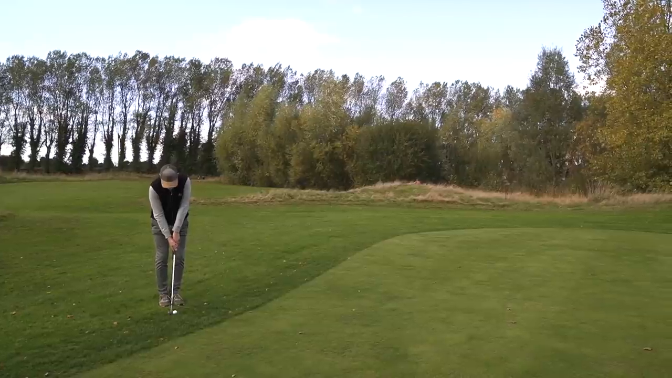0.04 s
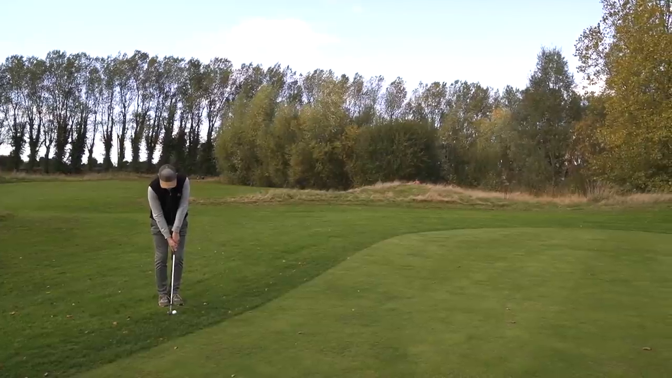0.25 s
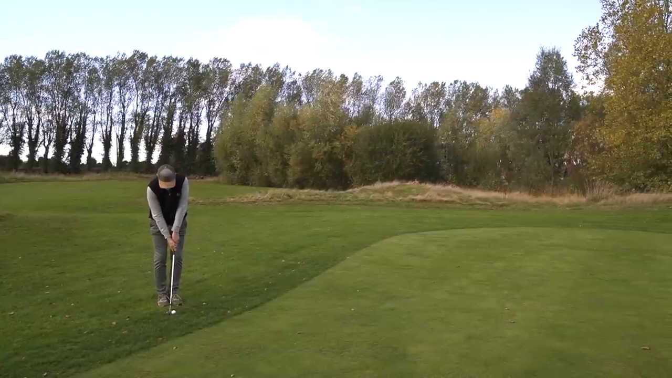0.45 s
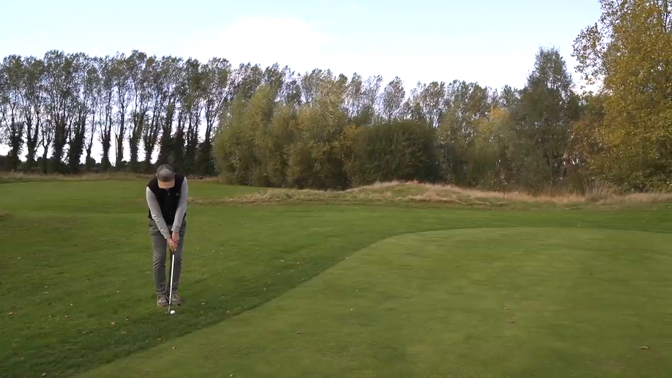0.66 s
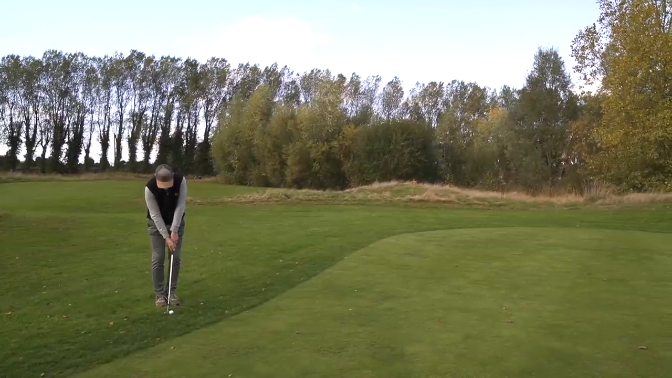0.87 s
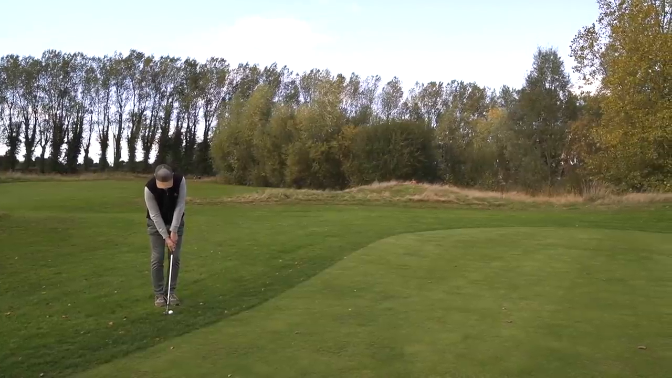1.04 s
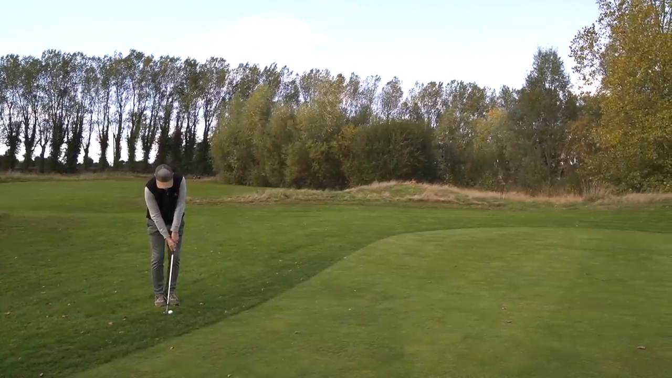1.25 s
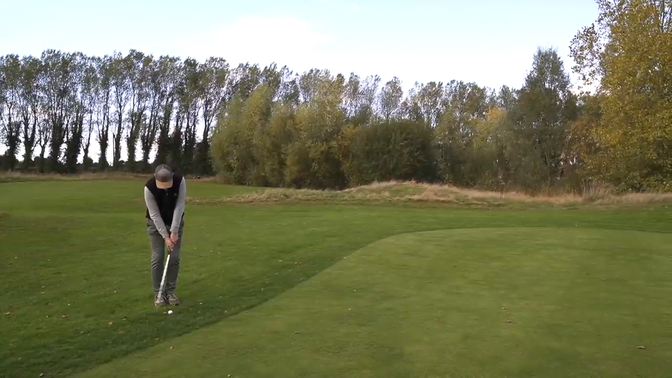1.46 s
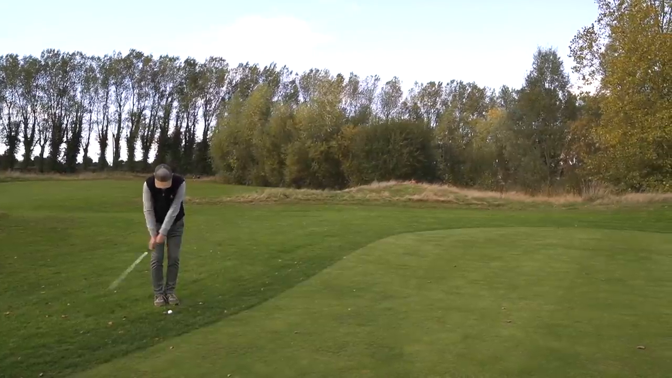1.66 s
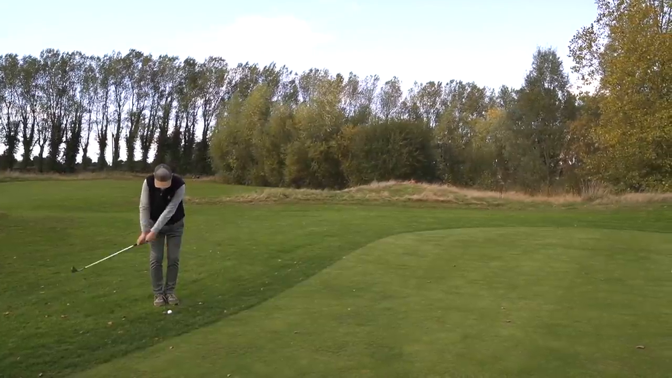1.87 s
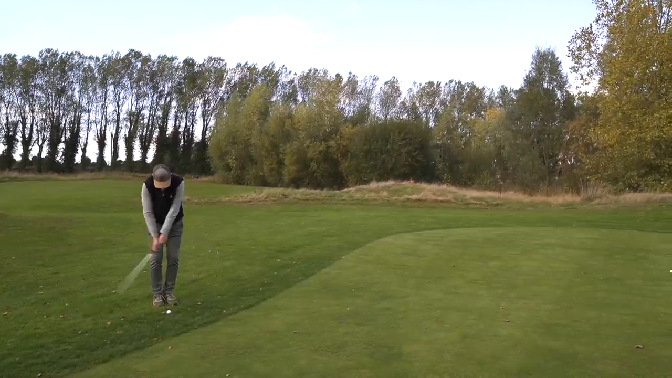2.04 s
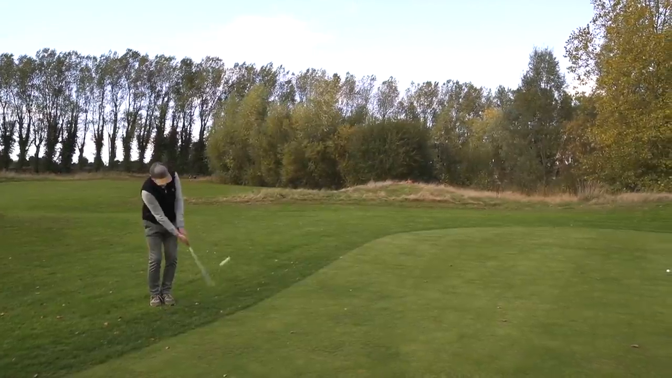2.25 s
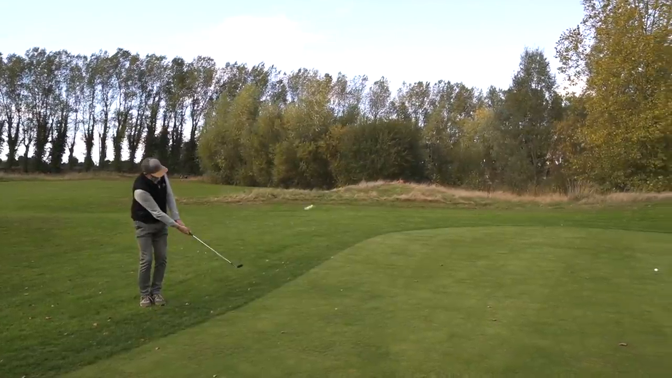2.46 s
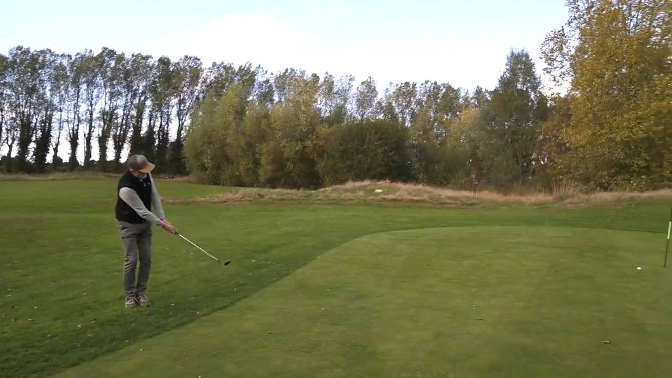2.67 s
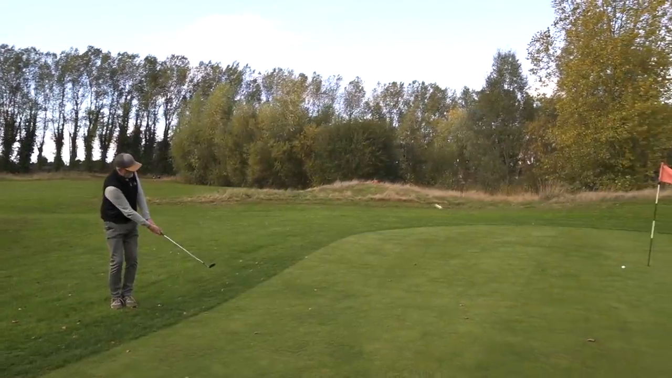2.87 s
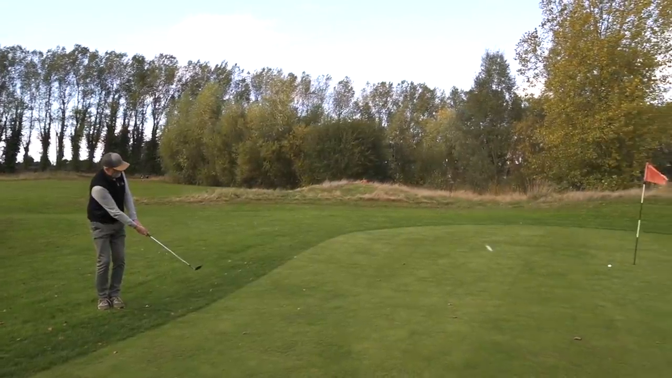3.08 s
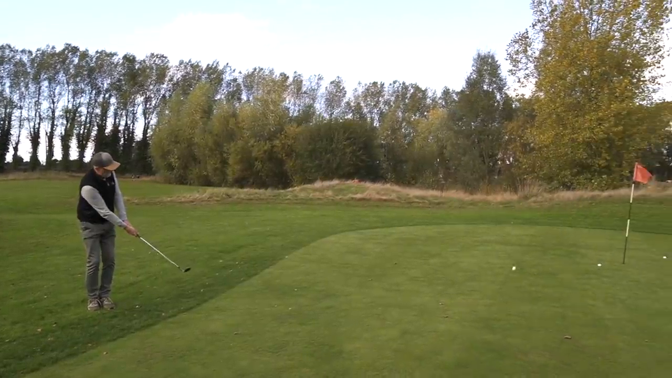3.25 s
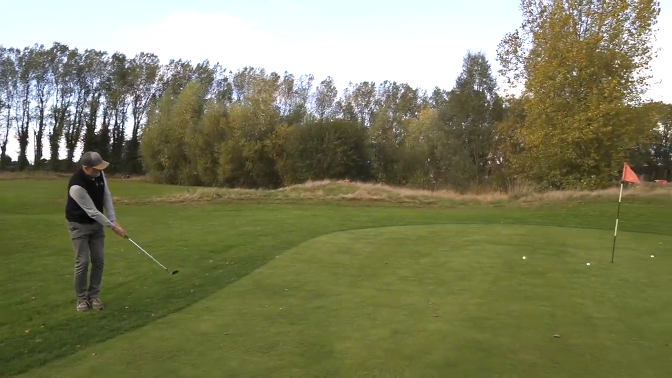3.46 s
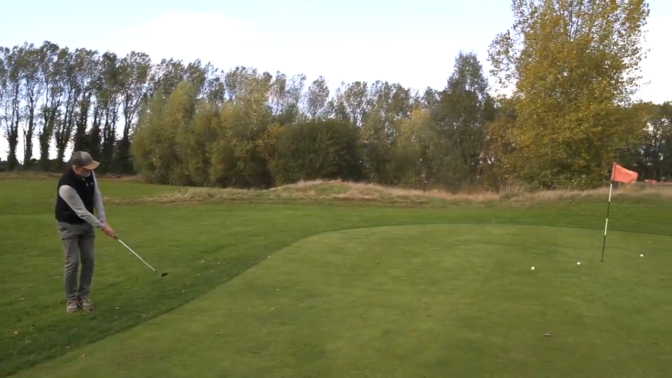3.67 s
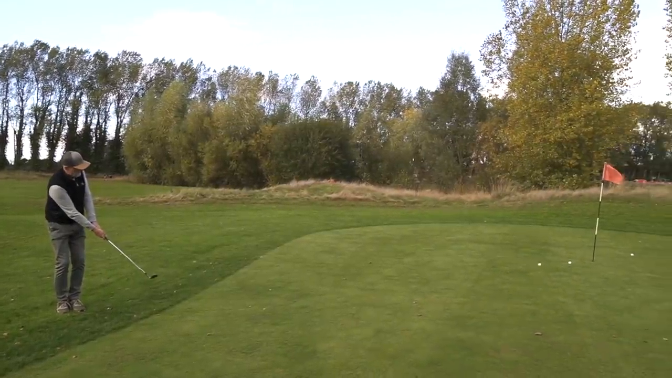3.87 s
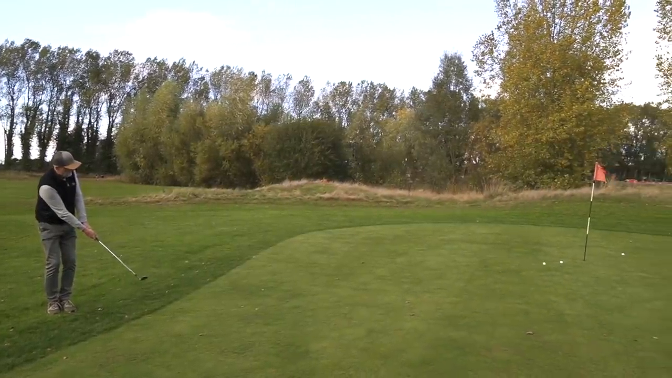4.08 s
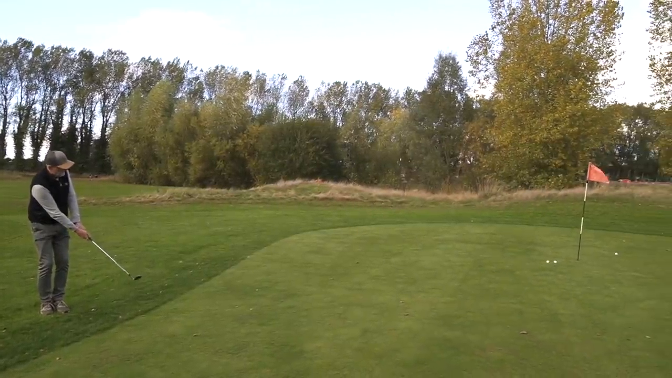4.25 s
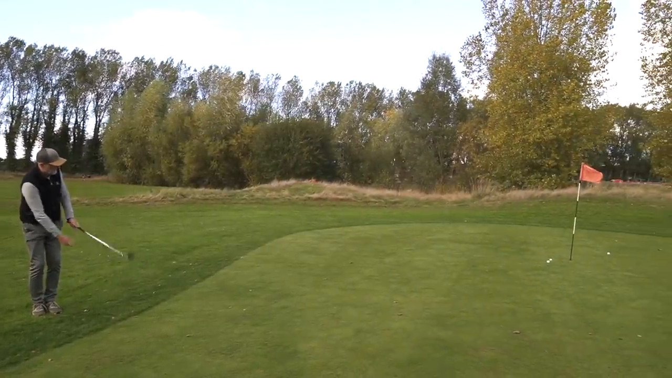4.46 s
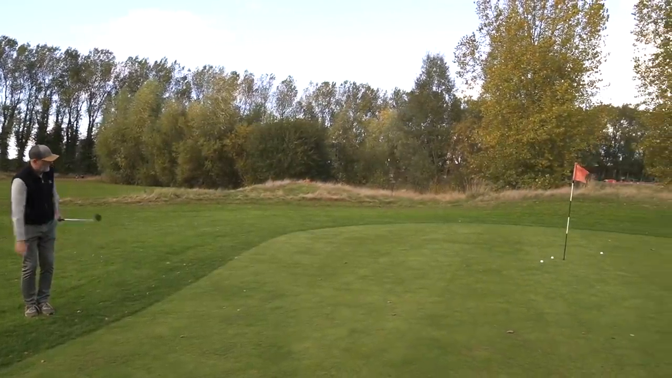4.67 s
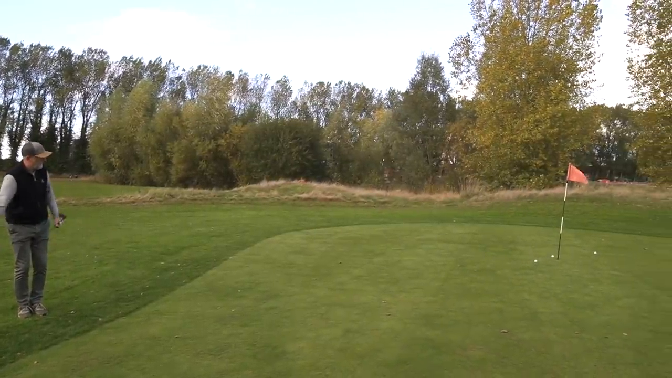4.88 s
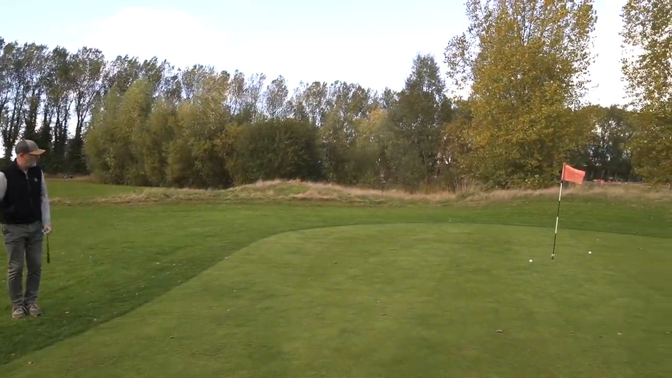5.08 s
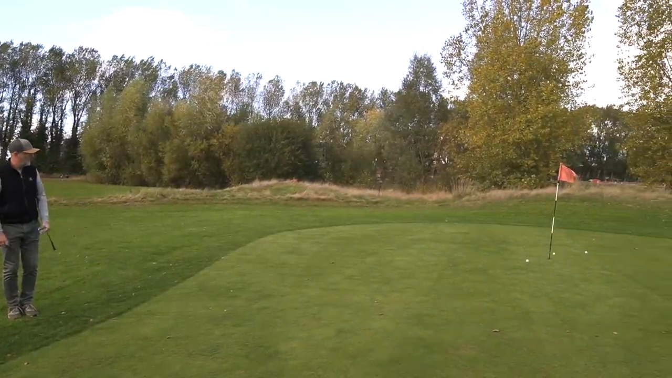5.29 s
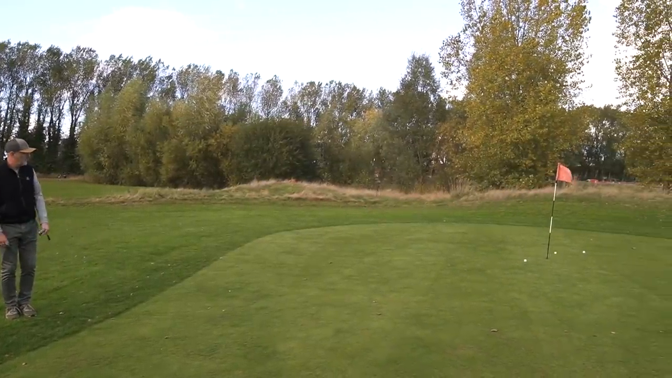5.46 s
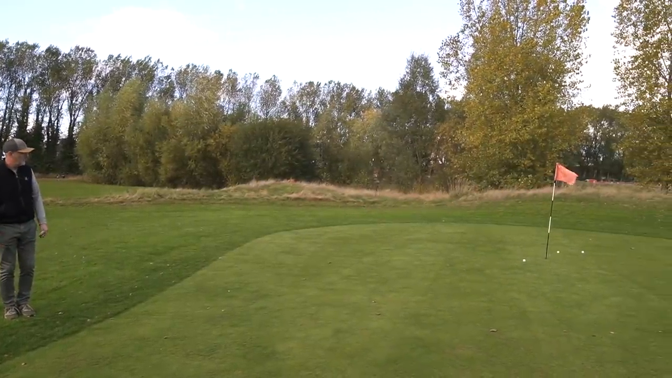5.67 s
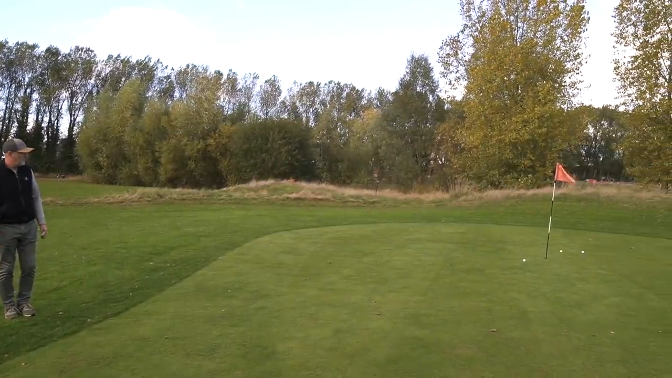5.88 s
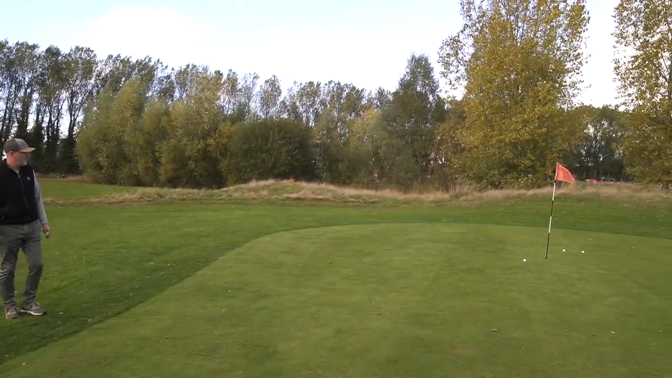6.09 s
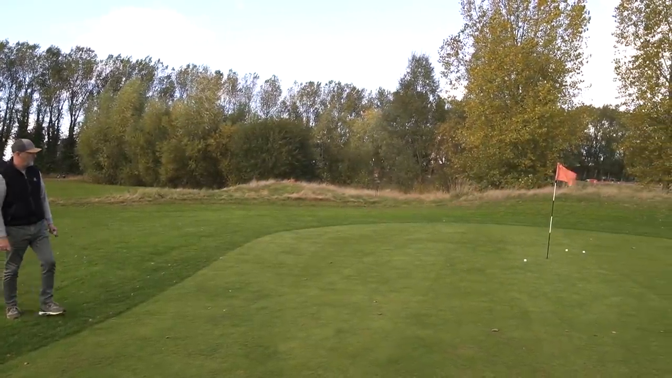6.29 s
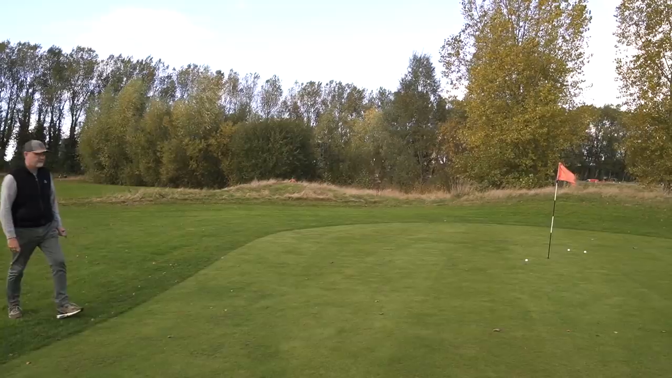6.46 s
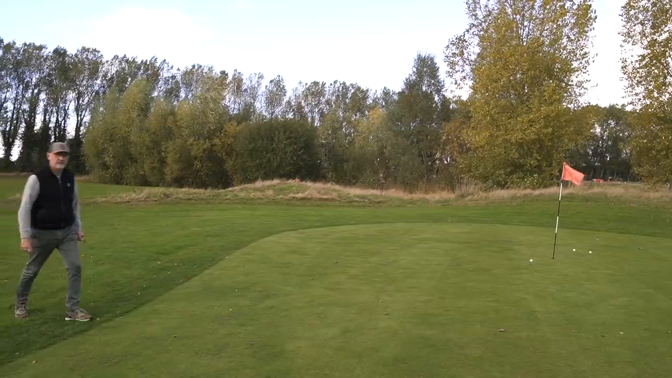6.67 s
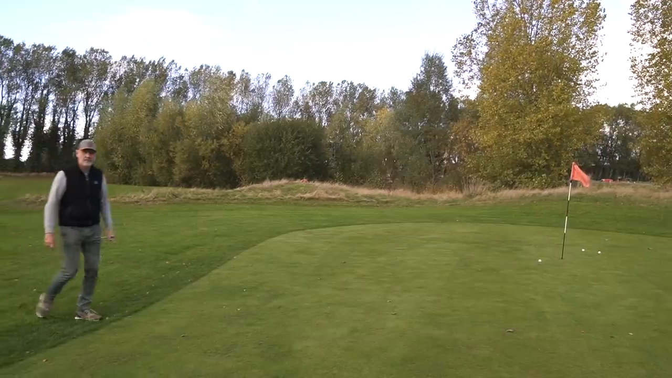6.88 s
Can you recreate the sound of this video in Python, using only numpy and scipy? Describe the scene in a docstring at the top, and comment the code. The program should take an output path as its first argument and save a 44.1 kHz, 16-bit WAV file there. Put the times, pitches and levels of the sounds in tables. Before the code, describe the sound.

Outdoors on a golf course, wind murmurs in distant trees and lightly buffets a microphone clipped to a jacket. Cloth rubs and bumps during the backswing, then the club hits the ball with a sharp, dry clack and a brief brush of grass. A second later the ball thuds on the green and bounces once. The jacket rustles, ticks and thumps again as the golfer turns and starts walking.

```python
"""On a breezy golf course, a golfer plays a short chip, heard from a small microphone on his jacket.
Wind murmurs in the trees and buffets the microphone. Cloth rubs, ticks and bumps against it in the
backswing, the stroke and the walk that follows. The club face clacks on the ball, the head rings and
the sole brushes the turf; a second later the ball thuds onto the green and bounces once."""
import sys
import numpy as np
from scipy import signal
from scipy.fft import rfft, irfft
from scipy.io import wavfile
from scipy.ndimage import uniform_filter1d

SR = 44100
rng = np.random.default_rng(int(sys.argv[2]) if len(sys.argv) > 2 else 0)


def output_pcm(signal):
    """Save a mono or channel-first signal as 16-bit PCM at the path in sys.argv[1].

    Samples are clipped to [-1, 1] before scaling.
    """
    pcm = np.clip(np.atleast_2d(signal).T, -1, 1) * 32767
    wavfile.write(sys.argv[1], SR, np.round(pcm).astype(np.int16))


N = 305613
T = np.arange(N) / SR
HIT_T = T[:8192]  # time axis of a one-shot


def undb(db):
    """Decibels to gain."""
    return 10 ** (np.asarray(db) / 20)


def unit(x):
    """Scale to rms 1."""
    return x / np.sqrt(np.mean(x ** 2))


def peak(x, db):
    """Scale to a peak level."""
    return x * undb(db) / np.max(np.abs(x))


def add(out, start_s, x):
    """Drop a one-shot into the mix."""
    i = int(start_s * SR)
    out[i:i + len(x)] += x[:N - i]


def butter(x, order, hz, kind):
    """Butterworth filter."""
    return signal.sosfilt(signal.butter(order, hz, kind, fs=SR, output="sos"), x)


def eq(x, curve):
    """Minimum-phase EQ through (freq_hz, gain_db) points: nothing rings ahead of an attack."""
    hz, db = np.transpose(curve)
    size = len(HIT_T)
    bins_hz = np.maximum(np.arange(size // 2 + 1), 1) * SR / size
    gain = undb(np.interp(np.log(bins_hz), np.log(hz), db))
    cepstrum = irfft(np.log(gain))
    cepstrum[1:size // 2] *= 2
    cepstrum[size // 2 + 1:] = 0
    impulse = irfft(np.exp(rfft(cepstrum)))
    return signal.fftconvolve(x, impulse)[:len(x)]


def drift(rate_hz):
    """Smooth random modulation with rms 1."""
    hold = int(SR / rate_hz)
    steps = np.repeat(rng.standard_normal(N // hold + 1), hold)
    return unit(uniform_filter1d(uniform_filter1d(steps, hold), hold)[:N])


def fade(t60_s, t=HIT_T):
    """Exponential decay, 60 dB down at t60_s."""
    return np.exp(-np.log(1000) * t / t60_s)


def ring(modes):
    """Damped modes set off by one blow."""
    return sum(undb(db) * fade(t60_s) * np.sin(2 * np.pi * hz * HIT_T) for hz, db, t60_s in modes)


def slips(per_s, spread_db):
    """Fibres catching and letting go: random clicks, mostly small, a few large."""
    size = undb(spread_db * np.minimum(rng.exponential(size=N), 5))
    return (rng.random(N) < per_s / SR) * size * rng.choice([-1, 1], N)


# Fader ride of the wind in the trees: time_s, level_db
BREEZE_RIDE = [(0, -54), (.9, -54.5), (1.4, -51.5), (1.95, -50), (2.7, -46), (3.9, -48.5), (4.5, -47),
               (5.5, -42.5), (6.3, -43.5), (6.93, -38)]
# Soft murmur of far trees: freq_hz, gain_db
TREES_EQ = [(18, -14), (30, -6.5), (55, -2), (90, -8.5), (130, -7), (180, -10), (230, -8.5), (280, -13),
            (370, -8.5), (520, -12.5), (780, -10), (1000, -14), (1350, -23), (2350, -29.5), (4000, -38),
            (6000, -39.5), (11700, -47.5), (16000, -54)]
# Low buffeting at the microphone: freq_hz, gain_db
BUFFET_EQ = [(15, -12), (30, -12), (55, -0.5), (110, -3), (200, -5.5), (320, -11), (700, -21.5),
             (2000, -66)]


def wind(stir, rest_db=-56.5, stir_gain_db=10.5):
    """Far trees murmur; eddies hit the microphone in uneven low puffs, stronger as the body moves."""
    trees = unit(eq(rng.standard_normal(N), TREES_EQ)) * undb(0.7 * drift(6))
    eddies = unit(eq(rng.standard_normal(N), BUFFET_EQ) * undb(2.0 * drift(35)))
    breeze = undb(np.interp(T, *np.transpose(BREEZE_RIDE)))
    return trees * breeze + eddies * np.hypot(undb(rest_db), undb(stir_gain_db) * stir)


# Patches of crinkle as the body turns: start_s, end_s, level_db
CRINKLE_CUES = [(1.79, 1.86, -68), (4.86, 5.19, -66), (5.29, 5.41, -69)]
# Thin, airy top of stiff fabric: freq_hz, gain_db
CRINKLE_EQ = [(2000, -25), (6000, -6), (12000, 0), (15000, 0), (16000, -8)]


def crinkle():
    """Sparse, very fine snaps while the stiff fabric is bent."""
    snaps = unit(eq(slips(per_s=160, spread_db=2.2), CRINKLE_EQ))
    gate = sum(undb(db) * ((T > start_s) & (T < end_s)) for start_s, end_s, db in CRINKLE_CUES)
    return snaps * gate


# Body moves, from backswing and stroke to turning away and the first steps:
# peak_s, strength_db, swell_s, settle_s, hiss_offset_db, air_offset_db
BODY_MOVES = [(1.42, -65.5, .12, .08, 0, -1), (1.63, -58.5, 0.1, 0.067, 1, 1.5),
              (1.755, -51, 0.083, 0.081, -.5, -2), (1.835, -56, .04, 0.035, 1, 4),
              (2.02, -60.5, 0.057, .05, 5.5, -8.5), (2.125, -49.5, 0.052, 0.068, 1.5, 2.5),
              (2.195, -48.5, 0.064, 0.041, 1.5, 1.5), (2.265, -55.5, .07, 0.1, -0.5, 0),
              (2.34, -58.5, .12, 0.023, 0, 6.5), (2.43, -68.5, .05, 0.066, 7, 0),
              (2.58, -67.5, 0.056, .06, 9, 0), (4.38, -55.5, 0.069, .08, 0.5, -6),
              (4.54, -46.5, .12, 0.11, -1, -0.5), (4.63, -49.5, 0.073, 0.066, 1.5, -1),
              (4.715, -49, 0.064, 0.064, 3.5, -9), (4.91, -50, 0.09, .08, 1.5, -6),
              (5.03, -46, .1, 0.15, -1, -2), (5.18, -50, .08, 0.12, -.5, -2),
              (5.31, -54, .07, 0.051, -.5, 1.5), (5.39, -57.5, .05, .015, -1, -1),
              (5.67, -54.5, 0.12, 0.06, .5, 1), (5.84, -54, 0.088, .06, 2.5, 0),
              (5.95, -48, 0.082, 0.093, -0.5, 0), (6.17, -54.5, 0.11, 0.13, -4.5, -5),
              (6.45, -50.5, 0.28, 0.26, -5.5, -3), (6.7, -42, 0.032, 0.045, 1, 1.5),
              (6.805, -46.5, 0.045, 0.063, 1, 4.5)]


def body_motion(drop_db=6, roundness=1.14):
    """Envelopes for rub, hiss and stirred air: moves swell and settle, and overlaps add in power."""
    power = np.zeros((3, N))
    for peak_s, db, swell_s, settle_s, hiss_db, air_db in BODY_MOVES:
        from_peak = np.abs(T - peak_s) / np.where(T < peak_s, swell_s, settle_s)
        envelope = undb(-drop_db * from_peak ** roundness)  # roundness 1 is pointed, 2 a bell
        power += np.outer(undb([db, db + hiss_db, db + air_db]), envelope) ** 2
    return np.sqrt(power)


# Hiss bands of the folds, broad to fine: centre_hz
FOLD_BANDS = [1800, 3500, 7000, 13000]


def swish(hiss, rate_hz=14, depth_db=1.7):
    """Different folds slide in turn, so each octave of the hiss swells and fades by itself."""
    octaves = np.log2(np.maximum(np.arange(N // 2 + 1), 1) * SR / N)
    centres = np.log2(FOLD_BANDS)
    crossfades = [np.interp(octaves, centres, solo) for solo in np.eye(len(centres))]
    bands = [irfft(rfft(hiss) * crossfade, N) for crossfade in crossfades]
    return sum(band * undb(depth_db * drift(rate_hz)) for band in bands)


# Dull body of friction, for cloth and also for soil: freq_hz, gain_db
RUB_EQ = [(100, -1.5), (250, -0.5), (500, -0.5), (900, -4), (1600, -6.5), (2300, -10), (3500, -19.5),
          (6000, -45.5), (16000, -40)]
# Bright sheen of sliding cloth: freq_hz, gain_db
HISS_EQ = [(1000, -15), (2500, -3.5), (4000, -1), (6000, -4.5), (8000, -8), (11000, -14), (14000, -17.5),
           (16000, -32)]


def jacket_rustle(pressure, speed, rub_db=-1, hiss_db=-6.5, crease_db=-17.0, bunch_db=3):
    """Cloth slides in jerks: coarse slips rub, fine ones hiss, and creases crackle in bunches."""
    jerks = undb(0.97 * drift(45))
    rub = eq(slips(per_s=6000, spread_db=2.5), RUB_EQ)
    rub /= np.std(butter(rub, 4, [1100, 1700], "band"))  # level set by its mids
    hiss = swish(eq(slips(per_s=15000, spread_db=4.0), HISS_EQ))
    hiss /= np.std(butter(hiss, 4, 4000, "high"))  # level set by its treble
    snaps = signal.fftconvolve(slips(per_s=70, spread_db=1.6), fade(.012))[:N]
    creases = eq(snaps * rng.standard_normal(N), [(1500, -23), (5000, -5), (12000, -10), (16000, -17)])
    creases = unit(creases * undb(bunch_db * drift(7)))
    top_layer = undb(hiss_db) * hiss + undb(crease_db) * creases
    return jerks * (pressure * undb(rub_db) * rub + speed * top_layer)


# Ticks of folds and fastenings: start_s, peak_db, low_hz, high_hz, scrape_t60_s
TICK_CUES = [(.083, -49.5, 2500, 6000, .012), (0.406, -47, 1000, 3230, 0.01),
             (1.593, -37.5, 280, 600, 0.011), (1.657, -31, 300, 985, 0.012), (1.724, -28, 350, 790, .012),
             (1.7608, -27, 400, 1390, 0.021), (1.841, -41, 9000, 14000, .02), (2.009, -34, 1100, 1800, .01),
             (2.291, -32.5, 10000, 15000, 0.0066), (4.279, -31, 446, 980, 0.018),
             (4.733, -27.5, 3400, 4700, .03), (4.744, -29, 2743, 4600, 0.028),
             (4.7862, -16.5, 473, 1480, 0.014), (4.7868, -26, 2180, 3350, 0.011),
             (4.7963, -24, 700, 1600, 0.009), (5.180, -35, 3000, 9000, .014),
             (5.339, -36.5, 5000, 13000, .008), (5.357, -38, 4000, 13000, .008),
             (5.397, -42, 6050, 14000, .008), (5.404, -38, 3000, 10000, .01),
             (6.132, -40, 3000, 7000, .008), (6.183, -29.5, 2390, 6000, 0.01),
             (6.233, -39, 3000, 7000, .008), (6.269, -37.5, 3600, 6000, .008),
             (6.442, -35, 5070, 9500, .008), (6.582, -36, 5500, 11000, .01),
             (6.7953, -34.5, 10000, 12500, .006), (6.801, -31, 2500, 5000, .01),
             (6.809, -26, 1000, 1900, .012), (6.869, -20.5, 2900, 4400, 0.0085),
             (6.869, -19.5, 400, 970, 0.017), (6.869, -34, 9300, 10500, .006)]


def jacket_ticks(scrape_db=-20, skirt_db=-22):
    """A fold or fastening snaps, with a short scrape behind it."""
    out = np.zeros(N)
    for start_s, db, low_hz, high_hz, t60_s in TICK_CUES:
        push = undb(scrape_db) * rng.standard_normal(len(HIT_T)) * fade(t60_s)
        push[0] += 1  # the snap
        band = [(low_hz / 2.5, skirt_db), (low_hz, 0), (high_hz, 0),
                (high_hz * 1.5, skirt_db), (high_hz * 8, -46)]
        add(out, start_s, peak(eq(push, band), db))
    return out


# Low thumps of cloth on the microphone: start_s, peak_db, pitch_hz, decay_cycles
BUMP_CUES = [(1.548, -33, 129, 0.26), (1.622, -35, 151, 0.31), (1.672, -29, 125, 0.32),
             (1.724, -13.5, 135, 0.25), (1.811, -27, 120, 0.3), (2.031, -36.5, 110, 0.45),
             (2.22, -36, 109, 0.38), (2.234, -29.5, 76.5, 0.4), (2.263, -29, 140, 0.36),
             (2.324, -30, 308, 0.42), (2.357, -30, 115, 0.23), (2.385, -31, 112, 0.18),
             (4.695, -20.5, 61, 0.31), (4.932, -25, 103, 0.32), (5.070, -30, 129, 0.48),
             (5.303, -25.5, 140, 0.57), (5.670, -24, 122.7, 0.26), (5.772, -27.5, 199, 0.29),
             (5.852, -21, 111, 0.16), (6.215, -32, 88, 0.3), (6.852, -18.5, 109, 0.8),
             (6.868, -14, 222, 0.23)]


def jacket_bumps():
    """Each bump is a push and pull of pressure that dies within a few cycles."""
    out = np.zeros(N)
    for start_s, db, pitch_hz, decay_cycles in BUMP_CUES:
        cycles = pitch_hz * HIT_T
        envelope = cycles * np.exp(-cycles / decay_cycles)
        add(out, start_s, peak(envelope * np.sin(2 * np.pi * cycles), db))
    return out


# The ball's two touches on the green: start_s, peak_db, contact_s
BOUNCE_CUES = [(3.27, -19, 0.00041), (3.7293, -27.5, 0.0026)]
# Hollow thud of the turf: pitch_hz, relative_db, t60_s
THUD_MODES = [(209, 10.5, 0.095), (307, 0, 0.11), (393, 9, 0.052), (473, 8.5, 0.061), (950, -22, 0.016)]


def ball_landing():
    """The ball thuds into the green; the slower bounce stays in contact longer and sounds duller."""
    out = np.zeros(N)
    for start_s, db, contact_s in BOUNCE_CUES:
        push = np.sin(np.pi * np.minimum(HIT_T / contact_s, 1))
        add(out, start_s, peak(signal.fftconvolve(push, ring(THUD_MODES)), db))
    return out


# Crisp brush of grass blades on the sole: freq_hz, gain_db
GRASS_EQ = [(1000, -51), (3000, 6), (6000, 3), (8000, -0.5), (12000, -4), (16000, -17)]


def turf_brush(deepest_s, grit_db=-37, grass_db=-42, scuff_db=-26):
    """The club's sole sinks into the grass with a gritty bite, scuffs the soil and brushes out."""
    def contact(release_t60_s, attack_t60_s=0.022):
        """Swell to the sole's deepest point, then die away."""
        return fade(np.where(T < deepest_s, attack_t60_s, release_t60_s), np.abs(T - deepest_s))

    blades = unit(eq(slips(per_s=12000, spread_db=2.5), GRASS_EQ))
    soil = unit(eq(rng.standard_normal(N), RUB_EQ))
    brush = blades * (undb(grit_db) * contact(0.0047) + undb(grass_db) * contact(0.13))
    return brush + undb(scuff_db) * soil * contact(0.011)


def linger(x, centre_hz, width_hz):
    """All-pass: delays one band without changing its level."""
    return x - 2 * signal.lfilter(*signal.iirpeak(centre_hz, centre_hz / width_hz, fs=SR), x)


# Midrange crack of the face on the ball: freq_hz, gain_db
CLACK_EQ = [(100, -20), (350, -38), (550, -4), (720, 0), (1000, -4), (1600, -1), (2050, -6), (2400, -32),
            (3000, -67), (4000, -92), (16000, -102)]
# Short ring of club and ball, plus a low thud of the turf at 287 Hz: pitch_hz, level_db, t60_s
STRIKE_MODES = [(287, -30, .04), (714, -26, .035), (3240, -40, .03), (3910, -44, .03), (4785, -41, .06),
                (5550, -44, .085), (6250, -45, .05), (7715, -42, .04), (8260, -49, .04), (11080, -44, .032),
                (12700, -52, .03)]


def club_strike(start_s, peak_db=-2, ring_lag_s=.0016, echo_lag_s=.0055, echo_db=-21):
    """The face meets the ball in a dry clack that slaps back off the ground; the head rings briefly."""
    out = np.zeros(N)
    clack = eq(signal.unit_impulse(len(HIT_T)), CLACK_EQ)
    clack = linger(clack, centre_hz=1030, width_hz=590)  # the low mids lag: a very fast pitch drop
    clack = peak(clack, peak_db)
    add(out, start_s, clack)
    add(out, start_s + ring_lag_s, ring(STRIKE_MODES))  # once the ball has left
    add(out, start_s + echo_lag_s, undb(echo_db) * clack)
    return out


def scene(strike_s=2.1965):
    """Open air, mono, no reverb: a wind bed, close cloth and the shot on top."""
    pressure, speed, stir = body_motion()
    bed = wind(stir)
    cloth = jacket_rustle(pressure, speed) + jacket_bumps() + jacket_ticks()
    shot = club_strike(strike_s) + turf_brush(deepest_s=strike_s + 0.0025) + ball_landing()
    return (bed + cloth + crinkle() + shot)[None]


# Noise floor of the microphone's electronics: freq_hz, gain_db
NOISE_FLOOR_EQ = [(8000, -0.5), (12000, -2), (16000, -6)]


def record(dry, hiss_db=-72, low_cut_hz=22, high_cut_hz=15800):
    """The electronics add a faint hiss, drop the deepest rumble and cut the top steeply."""
    noisy = dry + undb(hiss_db) * eq(rng.standard_normal(N), NOISE_FLOOR_EQ)
    high_cut = signal.ellip(10, .2, 70, high_cut_hz, fs=SR, output="sos")
    return signal.sosfilt(high_cut, butter(noisy, 2, low_cut_hz, "high"))


dry = scene()
out = record(dry)
output_pcm(out)
```